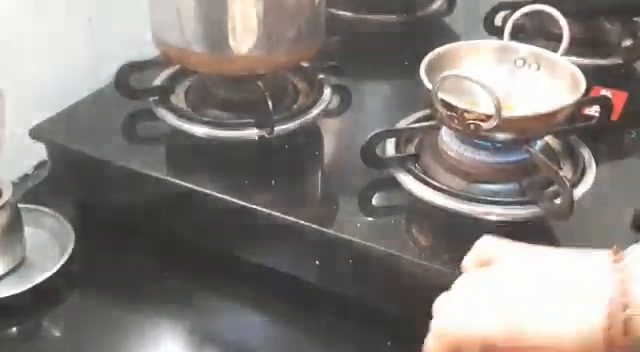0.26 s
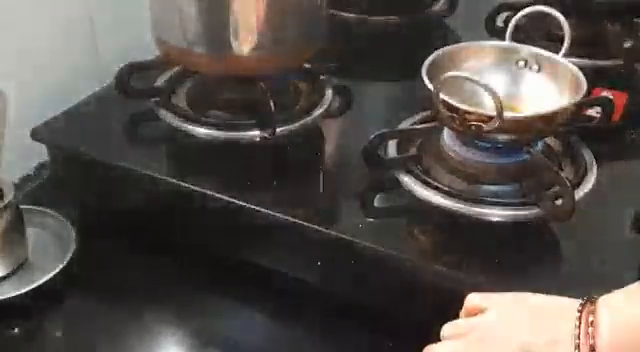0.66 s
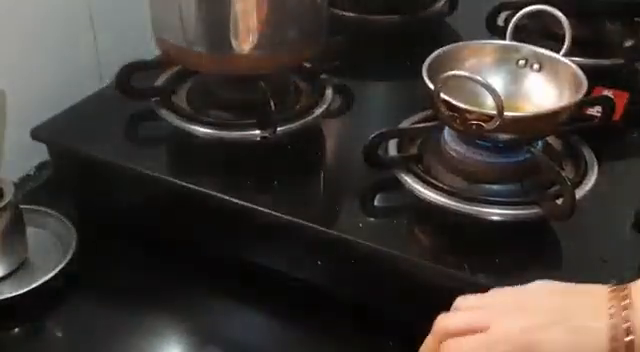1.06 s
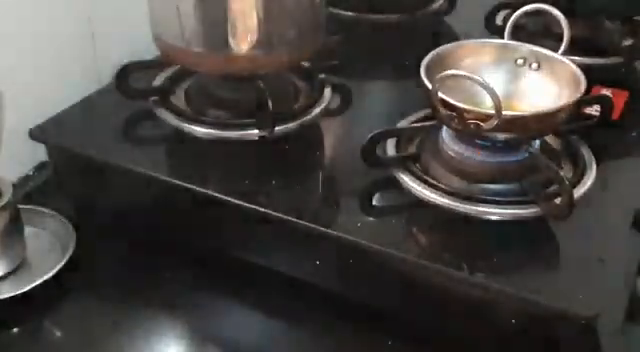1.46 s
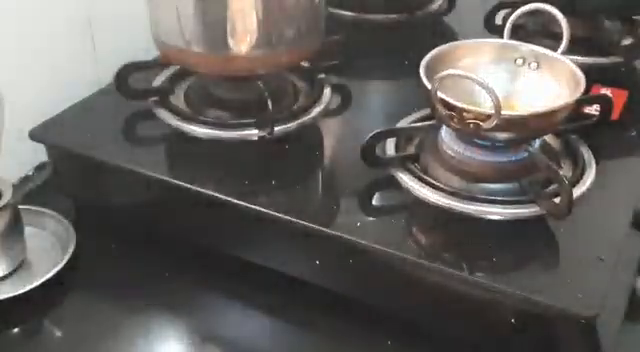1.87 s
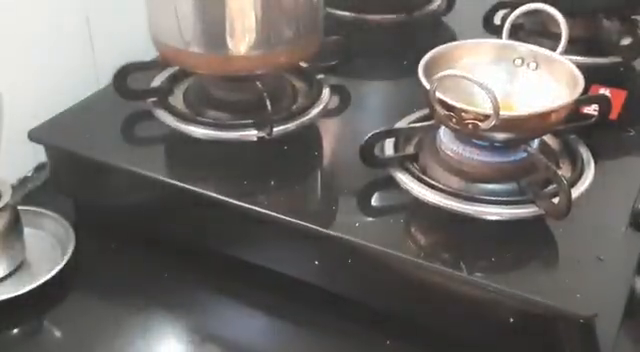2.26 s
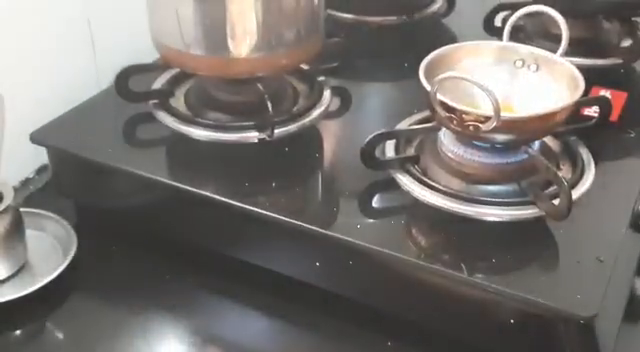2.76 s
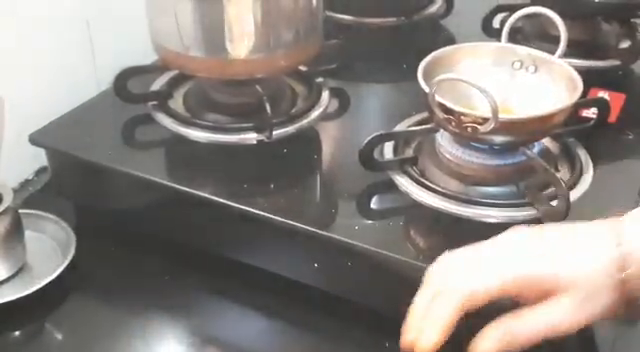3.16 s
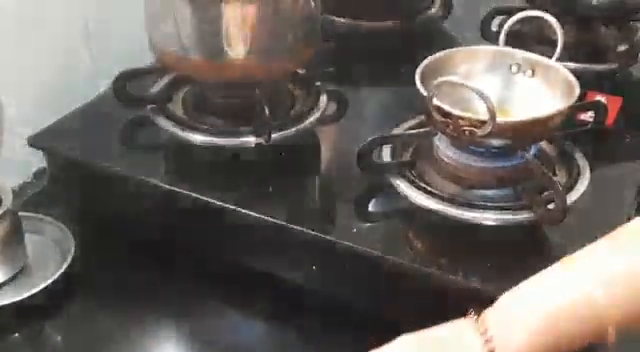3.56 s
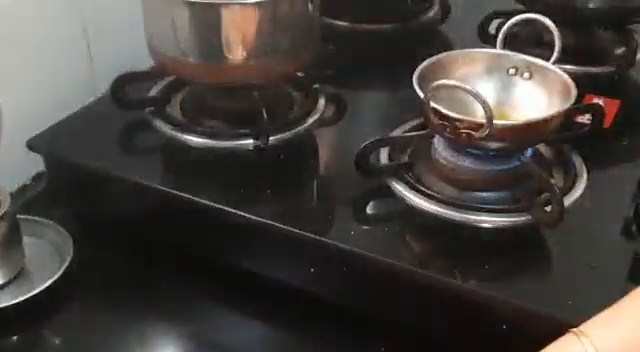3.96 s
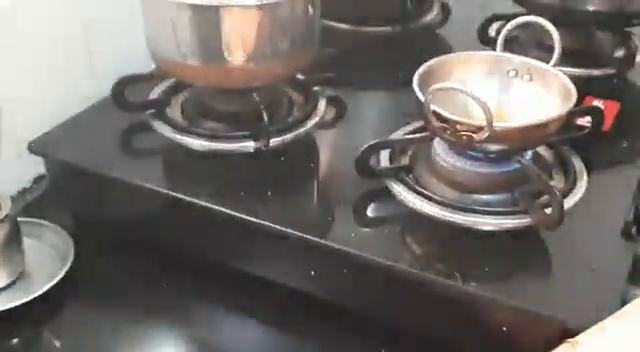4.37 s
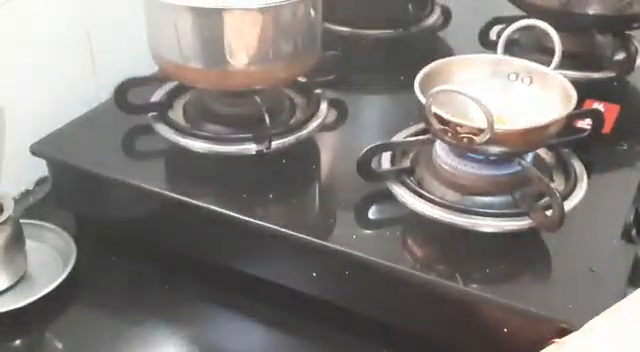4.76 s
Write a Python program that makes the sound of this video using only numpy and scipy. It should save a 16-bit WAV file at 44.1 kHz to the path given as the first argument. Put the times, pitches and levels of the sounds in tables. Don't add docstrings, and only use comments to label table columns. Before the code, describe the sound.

Close stereo pickup beside a stove, the left side a little louder and brighter. A bright metal knock and softer rattle come first, then mostly low gas rumble with scattered crackles. After three seconds come sharp pops, two scraping drags of a jar, tiny clinks, soft scuffs, ringing lid taps and a final cluster of pops.

```python
import sys
import numpy as np
from scipy import signal
from scipy.fft import rfft, irfft
from scipy.io import wavfile
from scipy.ndimage import uniform_filter1d

SR = 44100
rng = np.random.default_rng(int(sys.argv[2]) if len(sys.argv) > 2 else 0)


def makeup_ratio(level_db):
    decades = np.asarray(level_db, float) / 20
    return 10 ** decades


def unload_wav(signal):
    wavfile.write(
        sys.argv[1],
        SR,
        np.round(np.clip(np.atleast_2d(signal).T, -1, 1) * 32767).astype(np.int16),
    )


N = 221514
TAIL = int(.6 * SR)


def read(table, hz):
    rows = np.array(table, float)
    return np.interp(np.log(np.maximum(hz, 1)), np.log(rows[:, 0]), rows[:, 1])


def unit(x):
    return x / np.sqrt(np.mean(x ** 2))


def band(x, hz, width):
    sharpness = max(hz / width, .2)
    return signal.lfilter(*signal.iirpeak(min(hz, .45 * SR), sharpness, fs=SR), x)


def edge(x, hz, kind):
    return signal.sosfilt(signal.butter(2, hz, kind, fs=SR, output="sos"), x)


def ring(hz, t60):
    t = np.arange(TAIL) / SR
    return np.sin(2 * np.pi * hz * t) * np.exp(-np.log(1000) * t / t60)


def add(out, s, x):
    i = int(s * SR)
    out[:, i:i + x.shape[-1]] += x[..., :N - i]


def walk(rate):
    k = int(SR / rate)
    steps = np.repeat(rng.standard_normal(N // k + 1), k)
    return 0.73 * uniform_filter1d(uniform_filter1d(steps, k), k)[:N]


def room(wet_db, build_s):
    # pitch_hz, t60_s
    echo_times = [(800, 0.39), (2500, 0.36), (6000, 0.29), (12000, .3)]
    t = np.arange(TAIL) / SR
    spectrum = rfft(rng.standard_normal((2, TAIL)))
    hz = np.fft.rfftfreq(TAIL, 1 / SR)
    centres = np.log([f for f, _ in echo_times])
    out = np.zeros((2, TAIL))
    for k, (_, t60) in enumerate(echo_times):
        share = np.interp(np.log(hz + 1), centres, np.arange(len(centres)) == k)
        out += irfft(spectrum * share, TAIL) * np.exp(-np.log(1000) * t / t60)
    return out * makeup_ratio(wet_db) * np.clip(t / build_s, 0, 1)


def heard(x, wet_db, right_db):
    direct = x * makeup_ratio(np.array([[0], [right_db]]))
    echoes = signal.fftconvolve(np.atleast_2d(x), room(wet_db, 0.0026), axes=1)[:, :N]
    return direct + echoes


def burst(db, hz, low_db, top_db, width, length, dull_cut_hz, low_hz, top_hz, wet_db, modes, ring_db,
          hollow):
    t = np.arange(TAIL) / SR
    fade = np.exp(-t / length)
    grit = rng.standard_normal((4, TAIL))
    spikes = grit[0] * np.abs(grit[1])
    crack = (spikes + 0.81 * grit[2:]) * fade * makeup_ratio(np.array([[0], [-4.5]]))
    x = crack + room(wet_db, .004) * np.sqrt(np.sum(fade ** 2))
    struck = 1.6 * rng.standard_normal(len(modes))
    x = x + sum(makeup_ratio(ring_db + d + c) * band(x, f, w + 90) for (f, w, d), c in zip(modes, struck))
    tone = band(band(x, hz, width * hz), hz, width * hz)
    tone = edge(tone, hollow * hz, "high")
    dull = edge(edge(x, dull_cut_hz, "high"), .7 * dull_cut_hz, "high")
    dull = band(dull, low_hz, 1.2 * low_hz)
    bright = edge(edge(x, top_hz, "high"), 15000, "low")
    x = unit(tone) + makeup_ratio(low_db) * unit(dull) + makeup_ratio(top_db) * unit(bright)
    onset = np.sqrt(np.mean(x[:, :400].mean(axis=0) ** 2))
    return makeup_ratio(db - 13) * x / onset


def spoon_knocks():
    # start_s, peak_db, dull_db, bright_db, width (share of the ringing pitch)
    blows = [
        (0.3488, -28, 11, -13, 9.8),
        (0.458, -6, -40, -25, 4.54),
        (0.4724, -7, -25.5, -35, 3.26),
        (0.8559, -20, -20.5, -3, 4.3),
        (0.8655, -25, -6.5, -14.5, 1.4),
        (0.8795, -25, -9, -10.5, 2.5),
        (0.8943, -20.5, -4, -8, 2.6),
        (0.9086, -22.5, -11.5, -16.5, 2.02),
        (2.9842, -49, -14, -10, 6.5),
    ]
    # pitch_hz, width_hz, level_db
    steel = [(1690, 63, -3.5), (2143, 170, 2.5), (2410, 14, -7), (2790, 30, 0), (3270, 32, -4.5),
             (3908, 28, -12), (4352, 100, -8.5), (4690, 26, -6.5), (4910, 82, -15), (5100, 15, -11.5),
             (5204, 21, -10.5), (5660, 62, -6), (8680, 130, -3), (10800, 150, -5)]
    out = np.zeros((2, N))
    for s, db, low_db, top_db, width in blows:
        add(out, s, burst(db, 2200, low_db, top_db, width, length=0.0044, dull_cut_hz=98, low_hz=648,
                          top_hz=5150, wet_db=-22.5, modes=steel, ring_db=3.5, hollow=0.26))
    return out


def lid_taps():
    # start_s, peak_db, pitch_hz, bright_db
    touches = [
        (4.0324, -35.5, 4100, 6),
        (4.0606, -22, 2810, -8.5),
        (4.0844, -32, 2780, -24),
        (4.369, -41.5, 2520, -21),
        (4.3944, -31.5, 3730, -19),
        (4.4215, -33, 3000, -16),
        (4.435, -25, 3860, -16.5),
        (4.4452, -35, 3990, -19),
        (4.7234, -40, 3470, -9),
    ]
    # pitch_hz, width_hz, level_db
    lid = [(1960, 17, -5), (2364, 140, 0.5), (2910, 9.8, 2), (3440, 41, -1.5), (3990, 40, -8.5),
           (4300, 16, -9), (4700, 24, -9.5), (6040, 53, -15)]
    out = np.zeros((2, N))
    for s, db, hz, top_db in touches:
        width = 2.03 * (3000 / hz) ** 2.8
        add(out, s, burst(db, hz, -20.5, top_db, width, length=0.0024, dull_cut_hz=140, low_hz=646,
                          top_hz=5650, wet_db=-24.5, modes=lid, ring_db=5, hollow=0.31))
    return out


def seeds():
    # start_s, peak_db, pitch_hz, bright_db
    pops = [(0.1902, -59.5, 11200, -13), (0.2452, -60.5, 7900, -11), (1.2395, -51.5, 6540, -12),
            (1.3523, -56, 12600, -14), (1.4621, -49, 8990, -12), (1.559, -57.5, 3700, -2.5),
            (1.722, -36, 4420, -4.5), (2.3591, -31, 5150, -27), (3.0696, -36, 7750, -8),
            (3.0826, -31, 13000, 12), (3.4499, -36, 10600, 1)]
    # start_s, peak_db, pitch_hz, dull_db, bright_db
    bangs = [
        (4.8564, -21, 4100, -19, -26),
        (3.242, -16, 8800, 2.5, -0.3),
        (4.2278, -16.5, 11000, -6.5, 0.5),
        (4.8211, -17, 4580, -10.5, -2.5),
    ]
    # start_s, peak_db
    spits = [
        (3.2507, -22.5),
        (3.6521, -30),
        (3.6591, -28),
        (3.6912, -48),
        (4.236, -26),
        (4.8645, -22),
        (4.8749, -26),
    ]
    # start_s, peak_db, pitch_hz, dull_db, bright_db, width (share of the pitch)
    rows = []
    for s, db, hz, top_db in pops:
        dull_db = -13 - 8 * np.log2(hz / 5000)
        rows.append((s, db, hz, dull_db, top_db, .62))
    rows += [(*row, 1.8) for row in bangs]
    rows += [(s, db, 11230, -54, -3.5, 1.1) for s, db in spits]
    out = np.zeros((2, N))
    for k, (s, *row) in enumerate(rows):
        dull_hz = 3080 if k < len(pops) else 2260
        shell = [(row[1] * ratio, 0.015 * row[1], 0) for ratio in (.8, 1, 1.17)]
        add(out, s, burst(*row, length=.0025, dull_cut_hz=.8 * dull_hz, low_hz=dull_hz, top_hz=5973,
                          wet_db=-26.0, modes=shell, ring_db=-3.5, hollow=0.55))
    return out


def jar():
    # start_s, length_s, body_db, rasp_db
    drags = [
        (3.285, 0.14, -33, -36.5),
        (3.573, .18, -37.5, -38.5),
    ]
    # pitch_hz, width_hz, level_db
    body_modes = [(217, 100, -9.5), (293.7, 22.6, 0.5), (400, 50, 1.5), (505, 65, -2.5), (700, 106, -9),
                  (877, 74, -8), (1078, 160, -5.5)]
    # pitch_hz, width_hz, level_db
    rasp_modes = [(1990, 180, -4.5), (2605, 590, 5.5), (3250, 100, 5), (4340, 1100, -4.5),
                  (7450, 1600, -23)]
    slip_hz, jitter, scatter_db = 104, .06, 2.5
    bite_s, swell_s, lift_s = 0.0043, 0.033, 0.029
    chance = rng.standard_normal((N // 200, 2))
    at = (np.cumsum(1 + jitter * chance[:, 0]) * SR / slip_hz).astype(int)
    slips = np.zeros(N)
    slips[at[at < N]] = makeup_ratio(scatter_db * chance[at < N, 1])
    gate = 0.42 + unit(signal.lfilter([1], [1, -np.exp(-1 / (0.0104 * SR))], slips))
    drive = unit(slips) + 0.67 * rng.standard_normal(N)
    body = unit(sum(makeup_ratio(db) * unit(band(band(drive, f, 2 * w), f, w)) for f, w, db in body_modes))
    grit = gate * rng.standard_normal(N)
    rasp = unit(sum(makeup_ratio(db) * unit(band(grit, f, w)) for f, w, db in rasp_modes))
    out, t = 0, np.arange(N) / SR
    for s, length, body_db, rasp_db in drags:
        touch = np.interp(t - s, [0, bite_s, length, length + lift_s], [0, 1, 1, 0])
        body_db = body_db - np.interp(t - s, [0, swell_s, 0.59 * length, length], [8, 0, 8.5, 24])
        rasp_db = rasp_db - np.interp(t - s, [0, length], [0, 19.5])
        out = out + touch * (body * makeup_ratio(body_db) + rasp * makeup_ratio(2.0 + rasp_db))
    return heard(out, wet_db=-32.5, right_db=-2.5)


def tins():
    # start_s, peak_db
    clinks = [
        (1.3535, -60.5),
        (3.3184, -35),
        (3.3339, -35.5),
        (3.3442, -39),
        (3.3799, -35),
        (3.398, -42),
    ]
    # pitch_hz, level_db, t60_s
    tin = [(7900, 1, 0.044), (7880, 6, 0.04), (7900, 10.5, 0.08), (12600, 8, 0.054), (12950, 8, 0.045),
           (13600, 11, 0.052)]
    out = np.zeros((1, N))
    for (s, db), chance in zip(clinks, rng.standard_normal((len(clinks), len(tin)))):
        rings = sum(makeup_ratio(d + 1.7 * c) * ring(f, t60) for (f, d, t60), c in zip(tin, chance))
        add(out, s, makeup_ratio(db - 11) * rings)
    return heard(out, wet_db=-40.5, right_db=-8.5)


def thuds():
    # start_s, level_db, pitch_hz, t60_s, rise_s
    bumps = [
        (0.4591, -11.5, 68, 0.072, 0.0033),
        (0.4592, -14, 133.7, 0.047, 0.0014),
        (.4585, -13, 300, 0.025, 0.0018),
        (0.87, -50.5, 215, 0.59, 0.0071),
        (3.72, -25, 102.3, 0.19, 0.046),
    ]
    out, t = np.zeros((2, N)), np.arange(TAIL) / SR
    for s, db, hz, t60, rise in bumps:
        add(out, s, makeup_ratio(db) * np.array([[1], [.12]]) * ring(hz, t60) * np.clip(t / rise, 0, 1))
    return edge(out, 45, "high")


def rubbing():
    # middle_s, half_length_s, pitch_hz, level_db
    squeaks = [
        (1.27, 0.094, 1769, -80.5),
        (1.185, 0.092, 871, -76),
        (2.145, 0.15, 1144, -74.5),
        (2.8, 0.09, 1900, -86),
        (3.8, 0.067, 2060, -62.5),
        (3.825, .04, 2130, -72),
    ]
    # middle_s, half_length_s, pitch_hz, level_db
    scuffs = [(0.38, 0.027, 7000, -56), (3.027, 0.036, 2060, -53), (3.12, 0.081, 2250, -56),
              (3.228, 0.035, 2480, -48), (4.045, .013, 13000, -51.5), (4.096, 0.05, 445, -47),
              (4.627, 0.069, 690, -62.5), (4.88, 0.067, 2675, -55), (4.93, 0.11, 2200, -48),
              (4.85, 0.058, 700, -49.5), (4.77, 0.069, 11500, -55), (4.77, 0.05, 3400, -52)]
    t = np.arange(N) / SR
    rows = [(*row, 0.05) for row in squeaks] + [(*row, 1) for row in scuffs]
    out = 0
    for s, half, hz, db, width in rows:
        swell = np.exp(-((t - s) / half) ** 2)
        out = out + makeup_ratio(db) * swell * unit(band(rng.standard_normal((2, N)), hz, width * hz))
    return out


def flame():
    # time_s, rumble_db
    sizes = [
        (0, -60.5),
        (0.5, -60.5),
        (1.4, -66),
        (2.3, -60),
        (3.0, -60),
        (3.4, -56),
        (4.298, -59),
        (5.02, -56.5),
    ]
    # pitch_hz, level_db (per Hz)
    rumble_colour = [(18, -60.5), (30, -29.5), (65, -15), (86, -4), (101, 0.5), (215, -13.5), (238, -11.5),
                     (334, -13), (392, -13), (619, -25.5), (726, -31.5), (1400, -40), (3500, -50.5),
                     (4550, -76), (7700, -120)]
    # pitch_hz, width_hz, level_db
    burner = [(101, 9, -6), (134, 4, -10)]
    # pitch_hz, level_db (per Hz)
    hiss_colour = [(1760, -28), (3000, -20), (3460, -25.5), (3720, -12.5), (5200, -7), (11400, -3),
                   (15600, -15.5), (16200, -18.5), (16500, -43.5)]
    # pitch_hz, likeness (1 = same in both ears)
    likeness = [(60, 1), (130, 0.5), (290, 1), (640, 0.21), (1410, 0.29), (3100, -1), (6820, -0.79),
                (15000, -0.08)]
    # middle_s, half_length_s, rise_db
    flares = [
        (1.492, 0.032, 5.5),
        (2.35, .2, 2),
        (3.375, 0.17, 10.5),
        (3.905, 0.14, 3),
    ]
    hiss_start_db, hiss_end_db, hiss_growth_s = -84, -65.5, 1.2
    s, rumble_db = np.transpose(sizes)
    t, hz = np.arange(N) / SR, np.fft.rfftfreq(N, 1 / SR)
    alike = np.clip(read(likeness, hz), 0, 1)
    mid, side = rfft(rng.standard_normal((2, N)))
    pair = np.sqrt(1 + alike) * mid + np.sqrt(1 - alike) * side * np.array([[1], [-1]])
    rumble = 0
    for centre_hz in 25 * 2. ** np.arange(8):
        share = np.clip(1 - np.abs(np.log2((hz + 1) / centre_hz)), 0, 1)
        flicker = makeup_ratio(2.5 * walk(16))
        rumble = rumble + flicker * irfft(pair * share * makeup_ratio(read(rumble_colour, hz)), N)
    rumble = unit(rumble) + sum(makeup_ratio(db) * unit(band(rumble, f, w)) for f, w, db in burner)
    hiss = makeup_ratio(0.49 * walk(4.9)) * irfft(pair * makeup_ratio(read(hiss_colour, hz)), N)
    hiss_db = hiss_end_db + (hiss_start_db - hiss_end_db) * np.exp(-t / hiss_growth_s)
    hiss_db = hiss_db + sum(db * np.exp(-((t - at) / half) ** 2) for at, half, db in flares)
    return unit(rumble) * makeup_ratio(4.5 + np.interp(t, s, rumble_db)) + unit(hiss) * makeup_ratio(3.5 + hiss_db)


def scene():
    return spoon_knocks() + lid_taps() + seeds() + jar() + tins() + thuds() + rubbing() + flame()


def low_pass(x):
    return signal.sosfilt(signal.butter(12, 17100, fs=SR, output="sos"), x)


def record(dry):
    left_db, left_top_db, top_hz = 3.5, 2.5, 16700
    left = dry[0] + (makeup_ratio(left_top_db) - 1) * edge(dry[0], 4100, "high")
    x = np.array([left * makeup_ratio(left_db / 2), dry[1] * makeup_ratio(-left_db / 2)])
    x = np.tanh(x)
    x = signal.sosfilt(signal.ellip(10, .2, 95, top_hz, fs=SR, output="sos"), x)
    return low_pass(x)


dry = scene()
out = record(dry)
unload_wav(out)
```